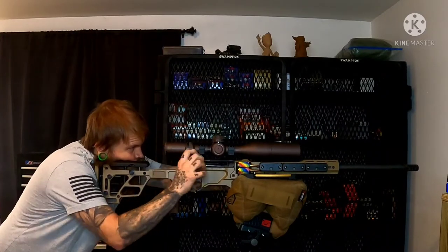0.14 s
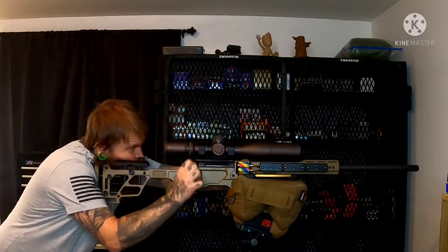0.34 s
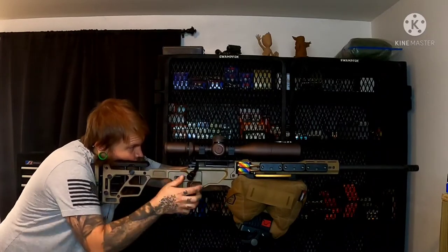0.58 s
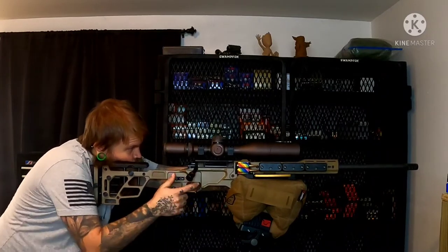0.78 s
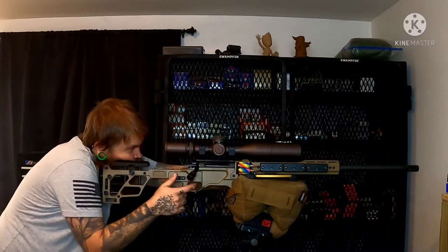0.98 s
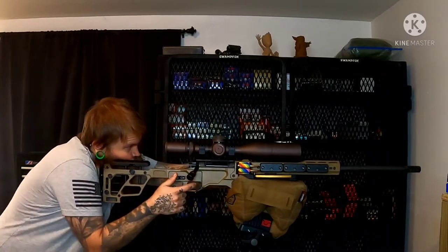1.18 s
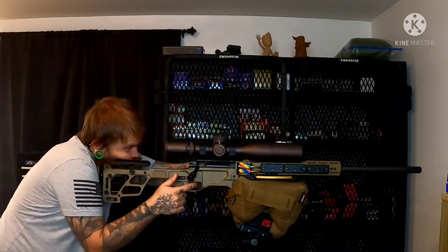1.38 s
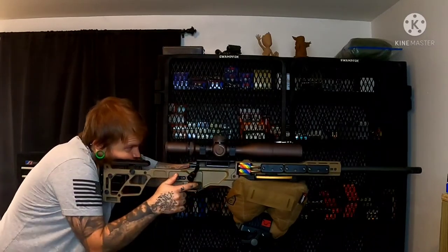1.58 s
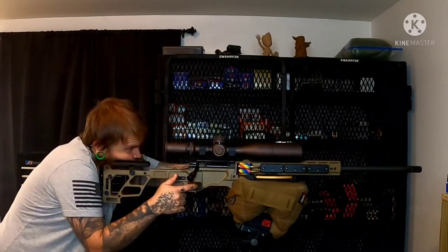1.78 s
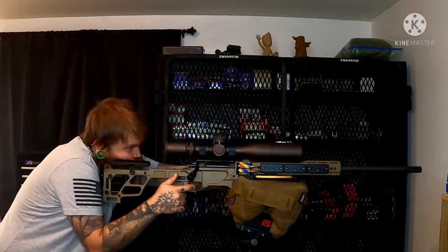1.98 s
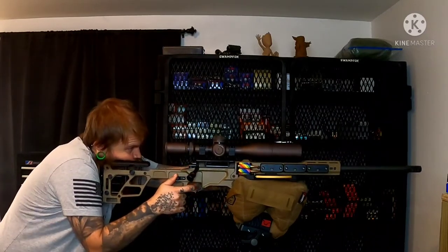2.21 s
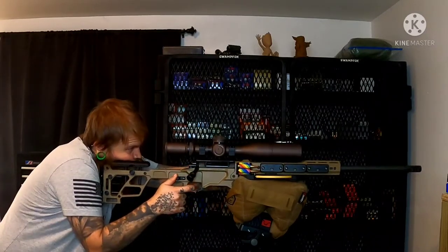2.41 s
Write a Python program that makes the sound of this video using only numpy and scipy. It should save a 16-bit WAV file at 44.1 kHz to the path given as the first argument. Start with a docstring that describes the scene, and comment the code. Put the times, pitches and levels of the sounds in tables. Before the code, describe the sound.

A rifle bolt rattles lightly at the start, slides home with sharp steel clacks around 0.25 seconds, and locks with a second cluster near 0.5 seconds, ringing briefly in a small room. From about 1 second the rifle scrapes quietly on its rest. Soft stock bumps and sleeve rustle follow between 1.5 and 2 seconds. Faint hiss and a low drone continue underneath, all heard from a little way off.

```python
"""A bolt-action rifle is worked in a small room, a little way off, over faint hiss and a low drone.
The bolt rattles, slides home, then is turned down and locked at about 0.5 s: each steel contact
cracks, chatters and rings the barrel and the room. From about 1 s the rifle scrapes on its rest
as it is settled. Last come soft bumps of the stock and rustling sleeves."""
import sys
import numpy as np
from scipy import signal
from scipy.fft import rfft, irfft, next_fast_len
from scipy.io import wavfile

SR = 44100
rng = np.random.default_rng(int(sys.argv[2]) if len(sys.argv) > 2 else 0)


def waveform_to_disk(signal):
    """Save audio, clipped to [-1, 1], as 16-bit WAV at the path in sys.argv[1]."""
    frames = np.transpose(np.atleast_2d(signal))
    scaled = np.clip(frames, -1, 1) * 32767
    samples = np.round(scaled).astype(np.int16)
    wavfile.write(sys.argv[1], SR, samples)


N = 108045
SIDE = np.array([[1], [-1]])  # opposite sign left and right


def undb(db):
    """Decibels to gain."""
    return 10 ** (np.asarray(db) / 20)


def unit(x):
    """Scale to rms 1."""
    return x / np.sqrt(np.mean(x ** 2))


def on_log(hz, points):
    """Interpolate (freq_hz, value) points over log frequency."""
    freqs_hz, values = np.array(points, float).T
    return np.interp(np.log(np.maximum(hz, 1)), np.log(freqs_hz), values)


def hump(hz, centre_hz, octaves):
    """Bell over log frequency, 1 at its centre."""
    return np.exp(-.5 * (np.log2(hz / centre_hz) / octaves) ** 2)


def shelf(hz, edge_hz):
    """Smooth step, 0 below the edge to 1 above."""
    return 1 - 1 / (1 + (hz / edge_hz) ** 5)


def colour(x, db_at):
    """Minimum-phase filter with gain db_at(hz)."""
    n = 2 * next_fast_len(len(x))
    cepstrum = irfft(np.log(undb(db_at(np.arange(n // 2 + 1) * SR / n + 1))))
    cepstrum[1:n // 2] *= 2
    cepstrum[n // 2 + 1:] = 0
    return irfft(rfft(x, n) * np.exp(rfft(cepstrum)))[:len(x)]


def burst(env, passes=3):
    """Enveloped noise, flattened in spectrum, unit energy."""
    x = rng.standard_normal(len(env)) * env
    limit = 2 * env / np.linalg.norm(env)
    for _ in range(passes):
        spectrum = rfft(x)
        flat = irfft(spectrum / (abs(spectrum) + 1e-12), len(env))
        x = np.clip(flat, -limit, limit)
    return x / np.linalg.norm(x)


def add(out, start_s, x):
    """Mix x into out at start_s."""
    i = max(int(start_s * SR), 0)
    out[i:i + len(x)] += x[:len(out) - i]


# Hiss spectrum: freq_hz, relative_db
HISS_SPECTRUM = [(25, -51), (110, -17), (220, -6.5), (330, -10.5), (520, -14), (1150, -7), (1800, -10.5),
                 (3200, -19), (6000, -29), (9000, -37.5), (12000, -38), (14000, -48)]
# Hiss drift: time_s, offset_db
HISS_DRIFT = [(0, 1), (0.849, -1.5), (1.5, 1.5), (2.1, -1.5), (2.45, -1)]
# Left-right hiss spectrum: freq_hz, relative_db
SIDE_HISS_SPECTRUM = [(70, 0.5), (200, -3.5), (1000, -19), (12000, -18.5)]


def background(hiss_db=-59, drone_db=-71, rumble_db=-76, side_db=-86.5):
    """Room hiss, a low wavering drone and faint rumble, all filtered noise."""
    def noise(db_at):
        return unit(colour(rng.standard_normal(N), db_at))

    drone_hz, width_hz = 173.3, 29
    drift_db = np.interp(np.arange(N) / SR, *np.array(HISS_DRIFT).T)
    hiss = noise(lambda f: on_log(f, HISS_SPECTRUM)) * undb(hiss_db + drift_db)
    drone = noise(lambda f: -20 * np.log10(1 + (2 * (f - drone_hz) / width_hz) ** 2)) * undb(drone_db)
    rumble = noise(lambda f: 40 * hump(f, centre_hz=70.6, octaves=1.9)) * undb(rumble_db)
    side_hiss = noise(lambda f: on_log(f, SIDE_HISS_SPECTRUM)) * undb(side_db)
    return hiss + drone + rumble + side_hiss * SIDE


# Reverb bands: centre_hz, t60_s, level_db, build_s
ROOM_BANDS = [(150, 0.15, -5, .02), (450, 0.33, 6, .02), (1040, 0.37, 0, 0.0059),
              (3000, 0.32, -2.5, 0.0021), (11100, 0.23, -2.5, 0.0022)]


def room(x, delay_s=.0015):
    """Dense reflections that build quickly and last longest in the mids."""
    t, hz = np.arange(SR) / SR, np.arange(SR // 2 + 1)
    late_s = np.maximum(t - delay_s, 0)
    bend = 1.175  # above 1: lingers, then drops faster
    spectrum, tail = rfft(rng.standard_normal(SR)), 0
    for k, (_, t60_s, level_db, build_s) in enumerate(ROOM_BANDS):
        band = on_log(hz, [(row[0], j == k) for j, row in enumerate(ROOM_BANDS)])
        env = (1 - np.exp(-late_s / build_s)) * undb(-60 * (late_s / t60_s) ** bend)
        tail = tail + undb(level_db) * irfft(spectrum * band) * env / np.linalg.norm(env)
    return signal.fftconvolve(x, tail)[:N]


# Spectrum of the stereo fizz: freq_hz, gain_db
FIZZ_SPECTRUM = [(200, -32), (2500, -42.5), (6000, -31), (10000, -15.5), (13000, -2)]


def treble_width(x):
    """A faint high fizz, opposite in left and right, trailing each clack and scrape."""
    return colour(room(x), lambda f: on_log(f, FIZZ_SPECTRUM)) * SIDE


# Bumps of the stock: start_s, level_db, pitch_hz
STOCK_BUMPS = [(1.546, -49.5, 171.8), (1.613, -58.5, 246), (1.66, -63, 335), (1.778, -60, 183)]


def stock_bumps(peak_s=.023):
    """The cushioned stock gives low notes that swell and die away."""
    t, out = np.arange(SR // 2) / SR, np.zeros(N)
    env = (t / peak_s) ** 2 * np.exp(2 - 2 * t / peak_s)
    for start_s, level_db, pitch_hz in STOCK_BUMPS:
        add(out, start_s, undb(level_db) * env * np.sin(2 * np.pi * pitch_hz * t))
    return out


# Barrel and receiver modes: pitch_hz, bolt_open_db, bolt_seated_db
BARREL_MODES = [(275, -17, -15), (459, -5, -16), (594, -13, -6), (673, -8, -2), (2033, -2, -7),
                (2299, -4, -7), (2515, -4, 0), (2654, -1, -1), (2779, -6, -1), (3113, -1, -5),
                (3495, 0, -10), (3622, -3, -3), (4069, -5, -4), (4755, -3, -9)]


def barrel(seated, t60_s=.29):
    """Barrel and receiver ring after a blow; seating the bolt shifts the mode levels."""
    t = np.arange(SR // 2) / SR
    ring = np.zeros(len(t))
    for pitch_hz, open_db, seated_db in BARREL_MODES:
        ring += undb(seated_db if seated else open_db) * np.sin(2 * np.pi * (pitch_hz * t + rng.random()))
    return ring * undb(-60 * t / t60_s)


# Friction spectrum: freq_hz, relative_db
RUB_SPECTRUM = [(150, -27), (450, -26.5), (1000, -4.5), (1700, 0.5), (4500, -1.5), (5500, -6), (7000, -10),
                (10000, -17.5), (14000, -37.5)]
# Slides and rustles: start_s, attack_s, hold_s, release_s, relative_db, tilt_db_per_octave, peak_db
RUB_STROKES = [(0.059, 0.018, 0.015, 0.082, -43, -2.5, -4), (0.182, 0.031, .005, 0.016, -39.5, 2, -7),
               (0.961, 0.046, 0.052, 0.032, -39, -0.5, 0.5), (1.175, 0.027, 0.047, 0.048, -53.5, -4, -1),
               (1.263, 0.023, .012, 0.04, -45, -1, -5.5), (1.317, .02, 0.046, 0.079, -57, -4, -5),
               (1.384, .04, .02, .03, -64, 16, 15), (1.568, 0.08, 0.13, 0.19, -63.5, 0.5, 6)]


def rubs(gain=.5, grain_db=5.5, barrel_db=-67):
    """Grainy friction of bolt, rest and sleeves, faintly ringing the barrel."""
    t, out = np.arange(SR * 2 // 3) / SR, np.zeros(N)
    for start_s, attack_s, hold_s, release_s, relative_db, tilt_db_per_octave, peak_db in RUB_STROKES:
        grains = rng.standard_normal(len(t)) * undb(grain_db * rng.standard_normal(len(t)))
        scrape = colour(grains, lambda f: on_log(f, RUB_SPECTRUM)
                        + tilt_db_per_octave * np.log2(np.maximum(f, 500) / 2500)
                        + peak_db * hump(f, centre_hz=4750, octaves=.12))
        ring = undb(barrel_db) * signal.fftconvolve(grains, barrel(seated=True))[:len(t)]
        env = np.interp(t, np.cumsum([0, attack_s, hold_s, release_s]), [0, 1, 1, 0]) ** .86
        add(out, start_s, gain * undb(relative_db) * unit(scrape + ring) * env)
    return out


# Dense ring of the action: freq_hz, gain_db
STEEL_SPECTRUM = [(40, -39.5), (120, -24.5), (250, -9), (370, -14.5), (620, -4.5), (1000, -3.5),
                  (1800, 1.5), (3000, 2), (4900, -3), (5500, -7), (6800, -7), (8200, -17.5), (10800, -20.5),
                  (12000, -30.5), (14000, -44.5)]
# Bolt resonances: centre_hz, boost_db
BOLT_RESONANCES = [(660, 4.5), (4880, 3.5)]


def steel(blow, bass_db, mids_db, treble_db, ring_hz, ring_db):
    """The action colours a blow; each contact point favours other resonances above the bass."""
    mids_hz, ripple_step_hz, ripple_sd_db = 1210, 170, 2.2
    grid_hz = np.arange(0, SR / 2, ripple_step_hz)
    ripple_db = ripple_sd_db * rng.standard_normal(len(grid_hz)) * shelf(grid_hz, mids_hz)
    return colour(blow, lambda f: on_log(f, STEEL_SPECTRUM)
                  + sum(db * hump(f, hz, octaves=.04) for hz, db in BOLT_RESONANCES)
                  + bass_db * (1 - shelf(f, edge_hz=850))
                  + mids_db * hump(f, mids_hz, octaves=.41)
                  + treble_db * shelf(f, edge_hz=4800)
                  + ring_db * hump(f, ring_hz, octaves=.13)
                  + np.interp(f, grid_hz, ripple_db))


# Steel contacts: start_s, relative_db, bass_db, mids_db, treble_db, ring_hz, ring_db, room_db, chatter_s
BOLT_CONTACTS = [(0.049, -25, 12.5, 2, -22, 721, 9, -2.5, 0.012),
                 (0.0865, -27.5, 7, -2.5, 0, 4700, 5.5, -6.5, 0.0068),
                 (0.2066, -4, -3, -0.5, 3.5, 4450, 5.5, 2, 0.009),
                 (0.2114, -3, 0, 2.5, -0.5, 2182, 5.5, -4, .008),
                 (0.234, -22.5, 25, 0, 8, 450, 6, 1.5, .007), (0.261, 5, -6.5, 2.5, 6, 3413, 1.5, 1, .005),
                 (0.288, -6, 7, -3.5, -2, 3000, 8, -1, .007),
                 (0.4336, -8.5, -6.5, -4.5, -2.5, 4730, 15.5, -11.5, 0.0045),
                 (0.4389, -10.5, -14, 2.5, 5.5, 2020, 2, 5, 0.006),
                 (0.4474, 4, 2.5, -9.5, -1.5, 2670, 7, -4, 0.0072),
                 (0.4540, -3.5, 4.5, -10.5, -4.5, 753, 10.5, -2.5, 0.0025),
                 (0.4695, -5.5, -8.5, -3, 0, 3375, 5, -6, 0.014),
                 (0.4951, 3, 6, 6.5, 0, 4800, 2, -3, 0.0055),
                 (0.516, -8.5, 9.5, 9.5, -1.5, 950, 1.5, -11.5, 0.013)]


def bolt(seated_s=.42):
    """Each contact cracks, chatters and rings the barrel; returns direct sound and room feed."""
    crack_s, chatter_rise_s, barrel_rise_s = .001, .0007, .005
    crack_db, clack_db, barrel_db = -6, 11.5, -34
    direct_bass_db = -5  # bass arrives mostly via the walls
    t = np.arange(SR // 2) / SR
    direct, feed = np.zeros(N), np.zeros(N)
    for start_s, relative_db, *tone, room_db, chatter_s in BOLT_CONTACTS:
        crack = undb(crack_db) * burst(np.exp(-t / crack_s))
        chatter = burst((1 - np.exp(-t / chatter_rise_s)) * np.exp(-t / chatter_s), passes=1)
        clack = undb(relative_db + clack_db) * steel(crack + chatter, *tone)
        thinned = colour(clack, lambda f: direct_bass_db * (1 - shelf(f, edge_hz=850)))
        ring = barrel(seated=start_s > seated_s) * (1 - np.exp(-t / barrel_rise_s))
        add(direct, start_s, thinned + undb(relative_db + room_db + barrel_db) * ring)
        add(feed, start_s, undb(room_db) * clack)
    return direct, feed


def scene():
    """The rifle, centred, in its room."""
    clacks, clack_feed = bolt()
    friction = rubs()
    feed = clack_feed + friction
    return clacks + friction + treble_width(feed) + room(feed) + stock_bumps() + background()


def record(dry, cutoff_hz=13900):
    """Clip at full scale, then low-pass."""
    lowpass = signal.ellip(8, .2, 70, cutoff_hz, fs=SR, output="sos")
    return signal.sosfilt(lowpass, np.clip(dry, -1, 1))


dry = scene()
out = record(dry)
waveform_to_disk(out)
```